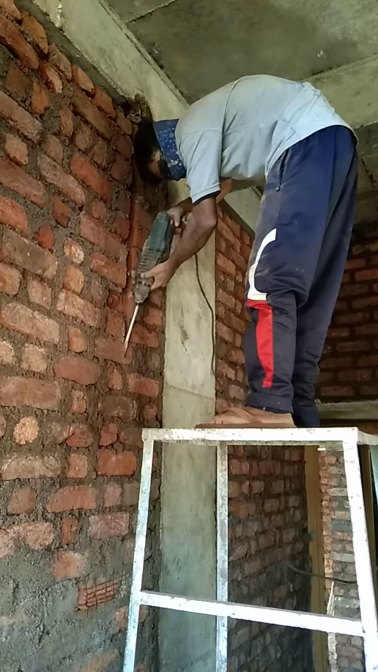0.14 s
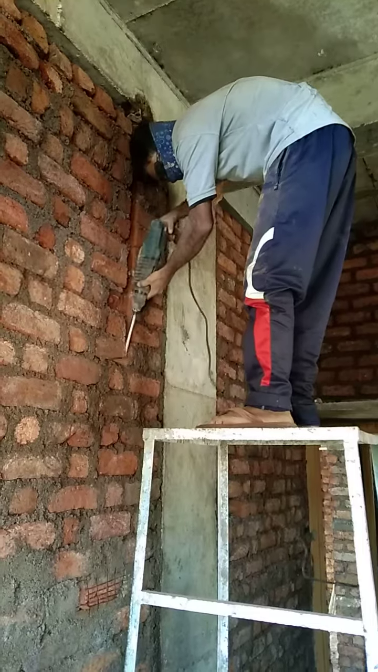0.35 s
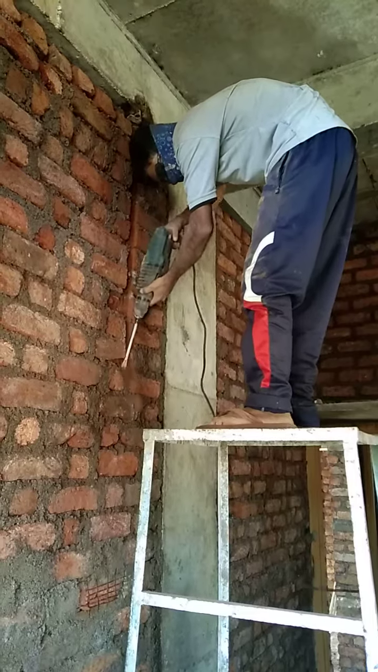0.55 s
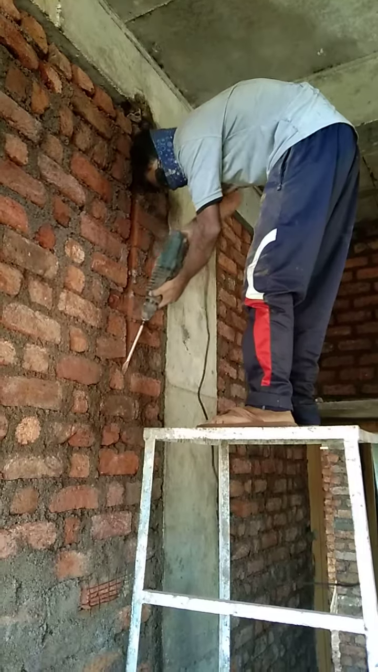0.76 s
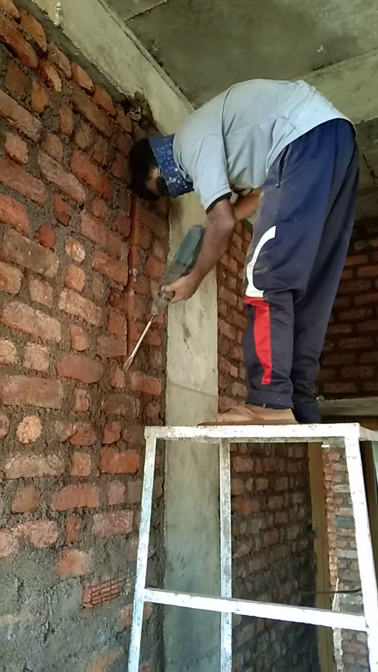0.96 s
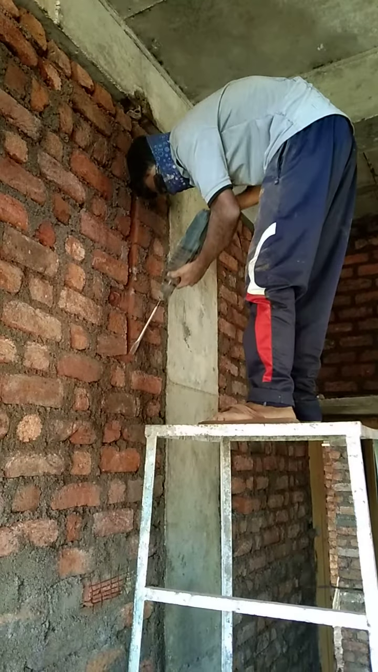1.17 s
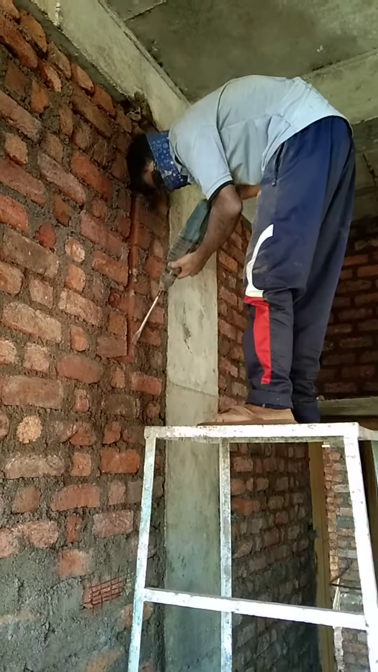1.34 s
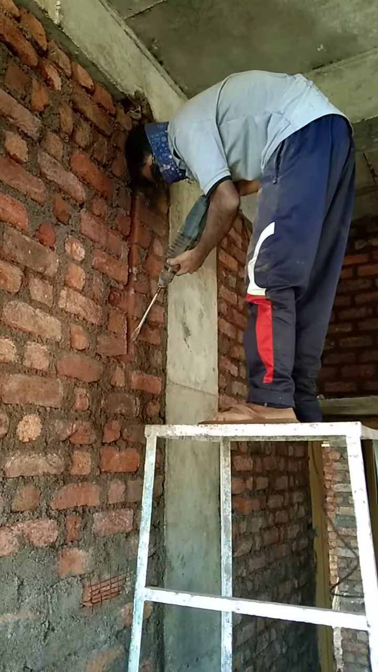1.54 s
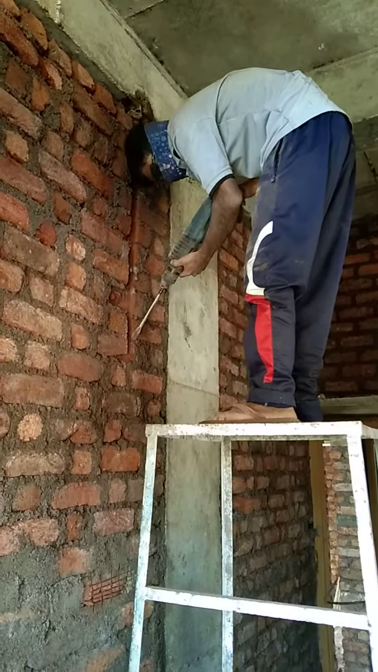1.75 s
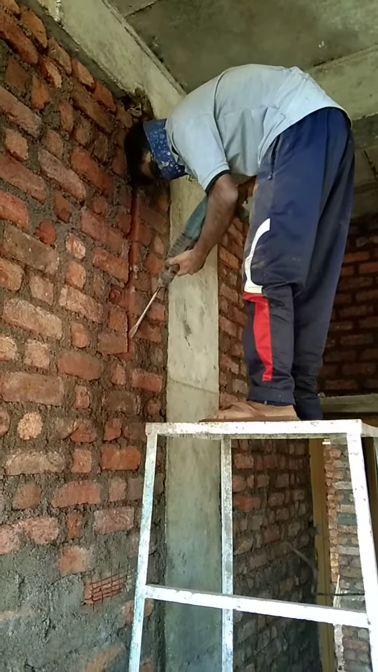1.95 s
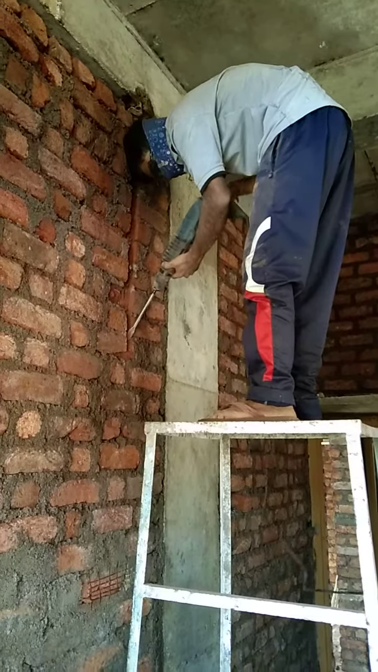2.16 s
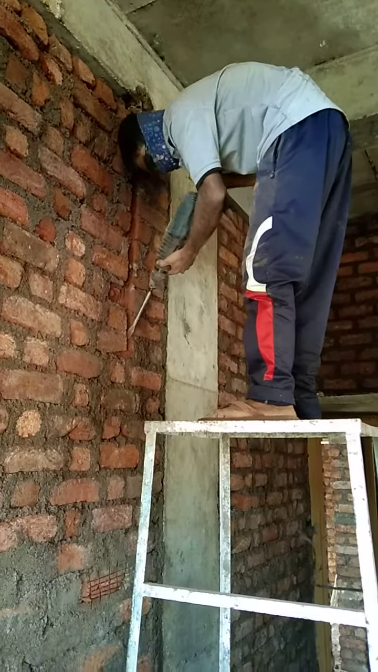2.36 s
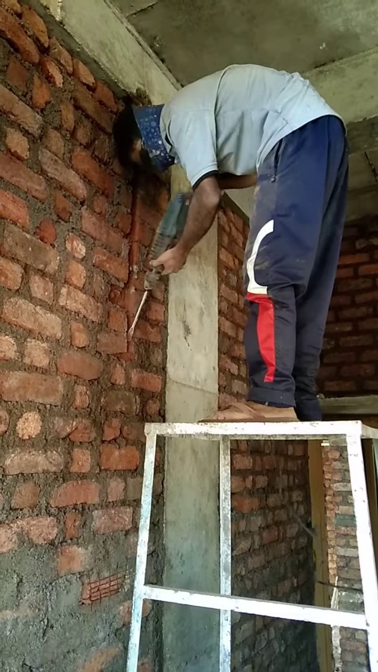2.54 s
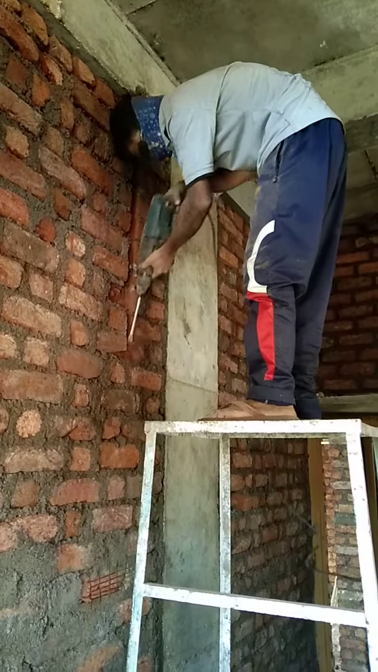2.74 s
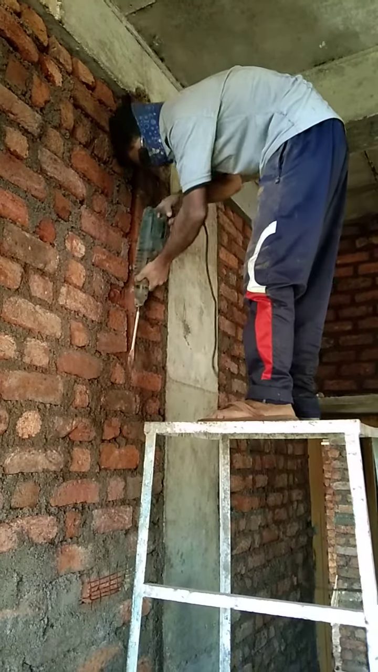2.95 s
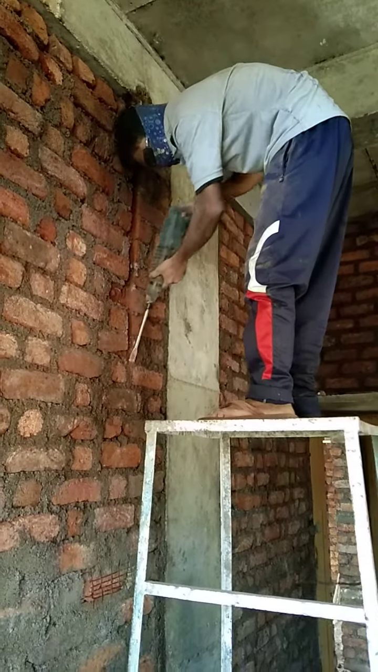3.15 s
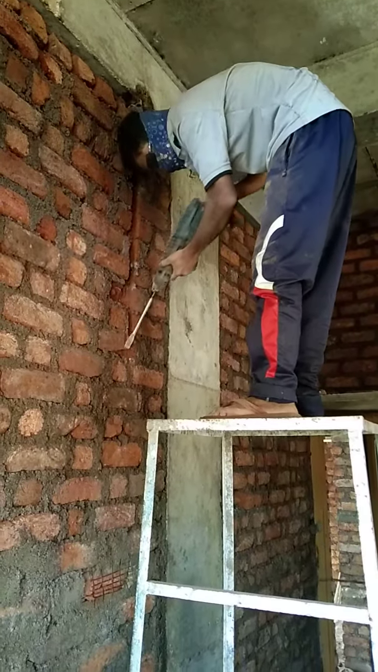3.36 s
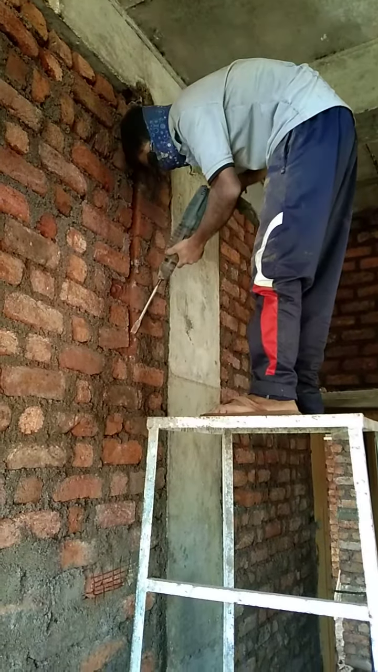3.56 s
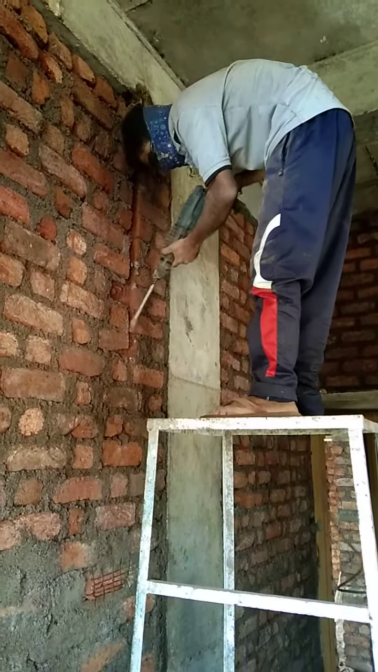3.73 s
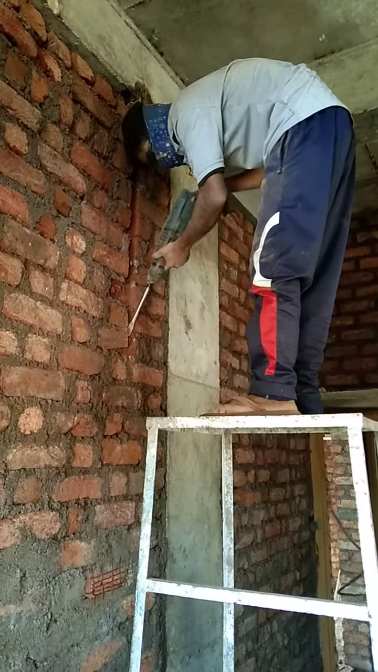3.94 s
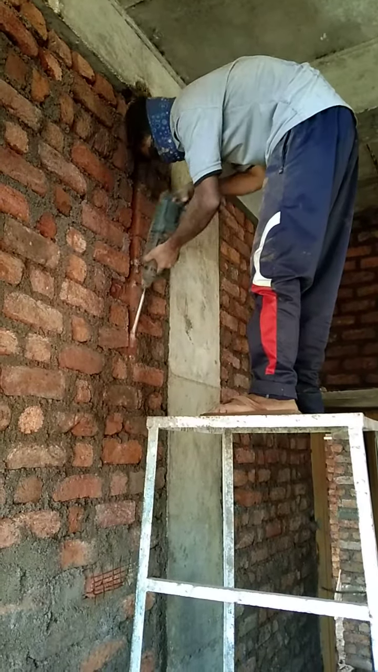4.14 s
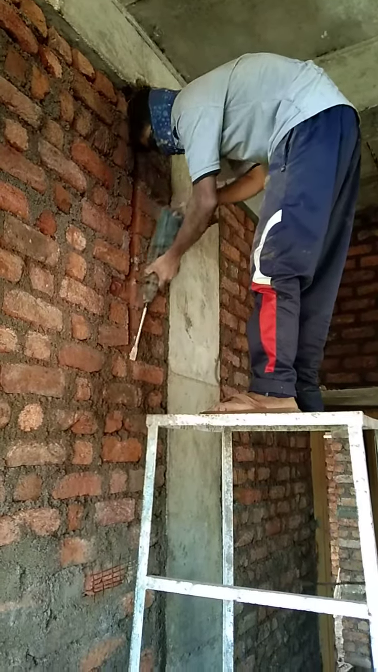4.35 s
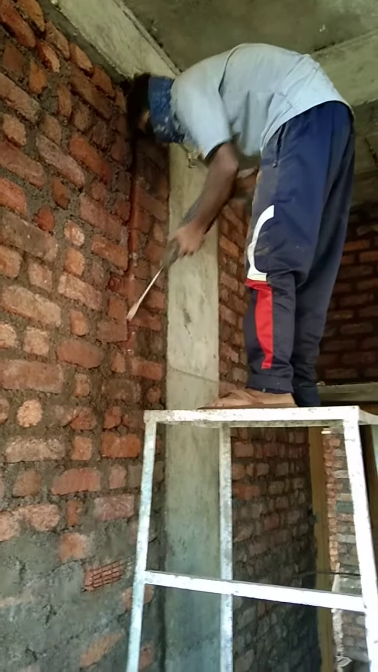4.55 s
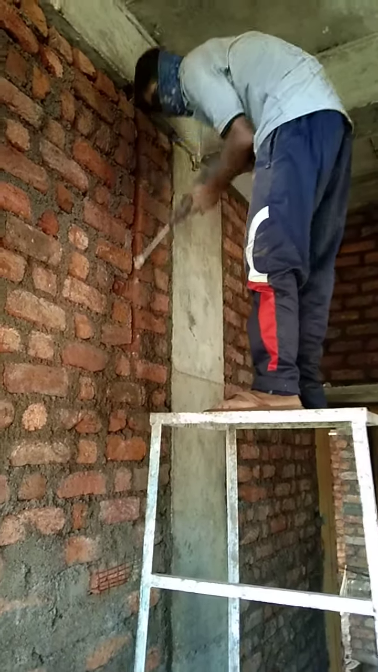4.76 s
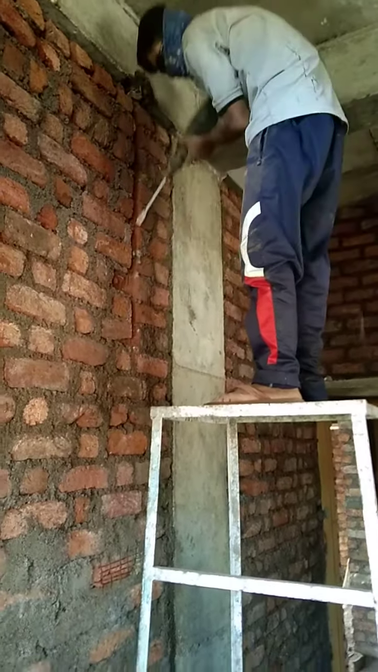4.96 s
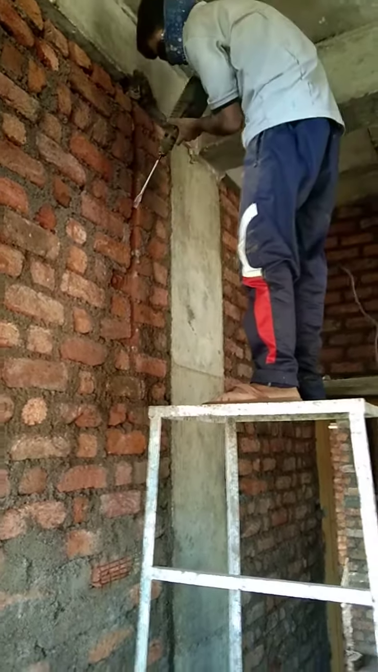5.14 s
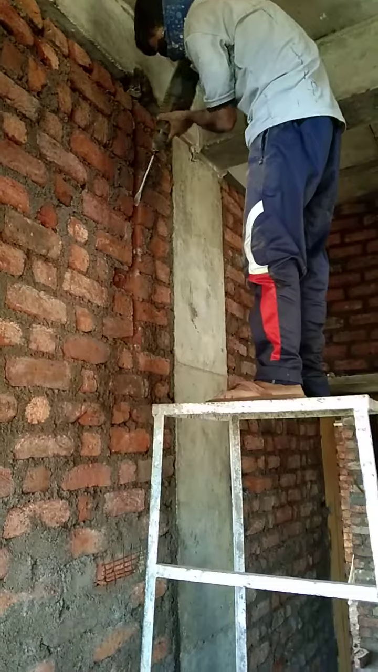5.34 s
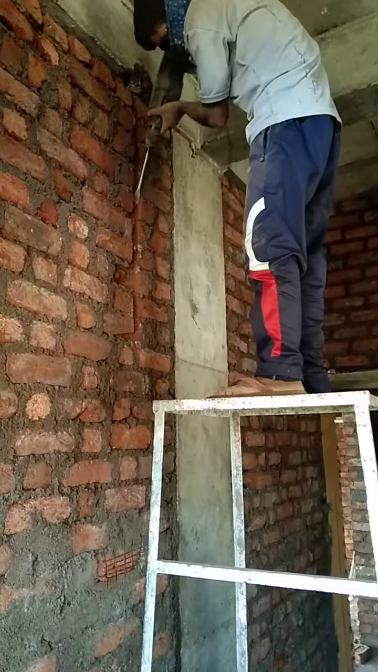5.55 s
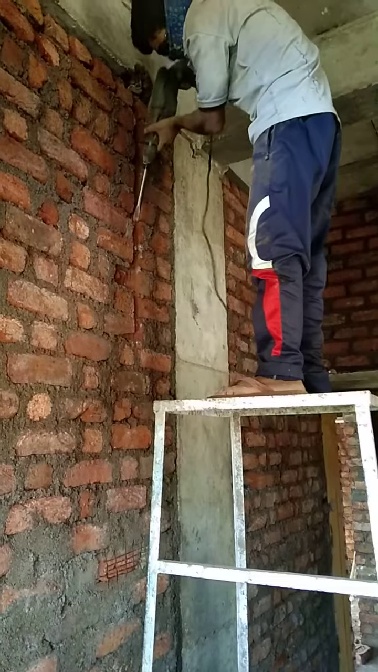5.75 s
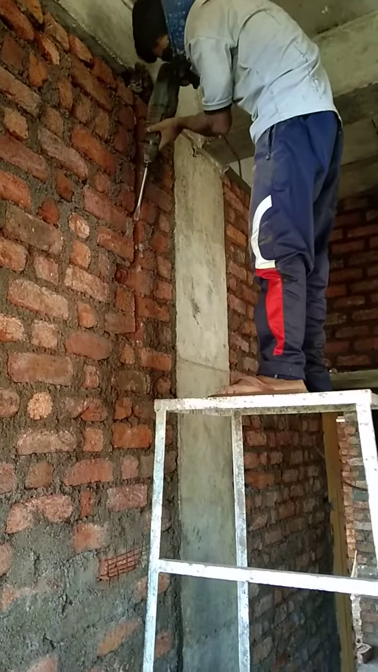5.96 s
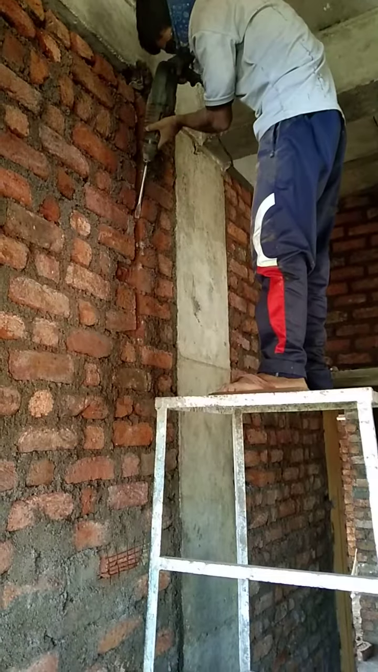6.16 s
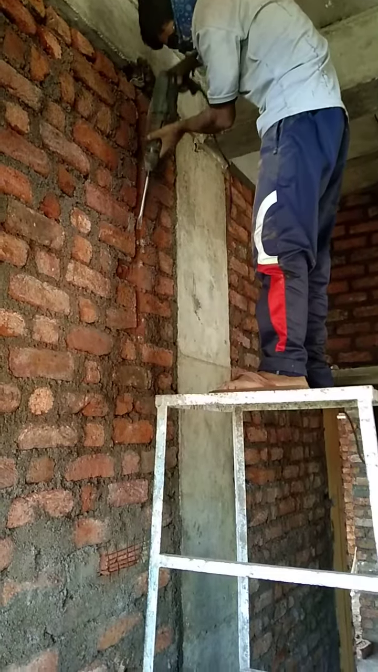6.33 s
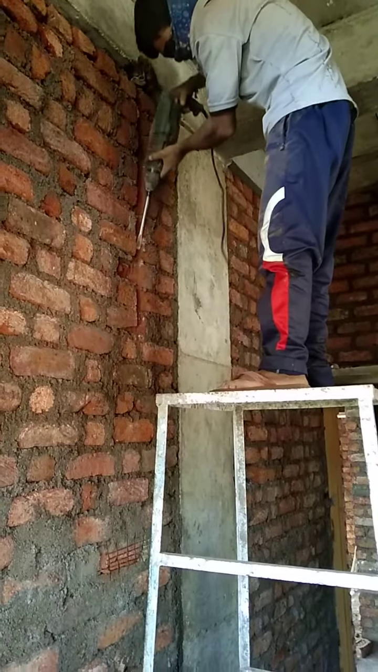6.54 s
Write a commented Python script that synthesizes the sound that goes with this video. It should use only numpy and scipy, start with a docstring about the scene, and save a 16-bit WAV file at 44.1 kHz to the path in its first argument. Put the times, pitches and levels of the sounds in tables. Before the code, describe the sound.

A rotary hammer chisels brick in harsh, rattling bursts, its motor whining down between them amid metallic clinks, scrapes and soft foot thuds.

```python
"""A rotary hammer chisels a brick wall in a bare room; the mic overloads on the hardest blows of the opening burst.
After .65 s the motor coasts down with a falling gear whine, while the loose bit clinks, feet thud on a steel
stand and a low hum sets in. A long burst from 1.8 to 3.1 s and a short one at 3.9 s each coast down too, then
clinks, scrapes, steps and ticking chips lead to a last burst from 5.6 s. Crank turns time noise bursts for the
blows and the phase of the whine; filtered noise makes the rest, and close walls add short echoes."""
import sys
import numpy as np
from scipy import signal
from scipy.fft import rfft, irfft
from scipy.io import wavfile
from scipy.ndimage import uniform_filter1d

SR = 44100
rng = np.random.default_rng(int(sys.argv[2]) if len(sys.argv) > 2 else 0)


def bounce(signal):
    """Save signal as a 16-bit WAV file at the path given by the first command-line argument."""
    frames = np.transpose(np.atleast_2d(signal))
    limited = np.clip(frames, -1, 1)
    pcm = np.round(limited * 32767).astype(np.int16)
    wavfile.write(sys.argv[1], SR, pcm)


N = 291060
T = np.arange(N) / SR
FULL_SPEED_HZ = 75  # reference speed, blows per second

# trigger pulls: pull_s, release_s, top_speed_hz (blows per second), spin_up_s
TRIGGER_PULLS = [(-1, .651, 70.57, .1), (1.765, 2.084, 40.27, .11), (2.084, 2.6, 81.09, .11),
                 (2.6, 3.087, 74.88, .03), (3.903, 4.237, 72.77, .058), (5.635, 6.6, 81.3, .098)]


def amp(db):
    """Decibels to gain."""
    return 10 ** (np.asarray(db) / 20)


def curve(rows):
    """Time and value rows joined by straight lines."""
    rows = np.array(rows)
    return np.interp(T, rows[:, 0], rows[:, 1])


def unit(x):
    """Scale to rms 1."""
    return x / np.sqrt(np.mean(x ** 2) + 1e-18)


def noise():
    """White noise."""
    return rng.standard_normal(N)


def colour(x, points, size=4096):
    """Causal minimum-phase filter of unit power gain, shaped through (Hz, dB) points."""
    hz, db = np.transpose(points)
    bins = np.fft.rfftfreq(size, 1 / SR)
    gain = amp(np.interp(np.log(bins + 1), np.log(hz), db))
    # folding the cepstrum forward makes the filter causal
    cepstrum = irfft(np.log(gain))
    cepstrum[1:size // 2] *= 2
    cepstrum[size // 2 + 1:] = 0
    response = irfft(np.exp(rfft(cepstrum)))
    return signal.fftconvolve(x, response / np.linalg.norm(response))[:N]


def band(x, hz, width):
    """One resonance, gain 1 at its centre; width in Hz."""
    return signal.lfilter(*signal.iirpeak(hz, hz / width, SR), x)


def resonate(x, modes):
    """A set of resonances sounding together, at rms 1."""
    return unit(sum(amp(db) * band(x, hz, width) for hz, width, db in modes))


def shelf(x, side, hz, db):
    """Raise or lower everything on one side of a frequency."""
    part = signal.sosfiltfilt(signal.butter(2, hz, side, fs=SR, output="sos"), x)
    return x + (amp(db) - 1) * part


def fade(x, seconds):
    """Give every impulse an exponential tail."""
    return signal.lfilter([1], [1, -np.exp(-1 / (seconds * SR))], x)


def gate(start, end, attack_s, release_s):
    """Envelope that rises, holds and dies away."""
    rise = np.clip((T - start) / attack_s, 0, 1)
    return rise * np.exp(-np.maximum(T - end, 0) / release_s)


def impulses(times, sizes):
    """Impulses of given sizes at given times."""
    samples = np.clip(np.asarray(times) * SR, 0, N - 1).astype(int)
    return np.bincount(samples, sizes, N)


def crank():
    """Blows per second: the crank runs up while the trigger is held; air drag and friction then slow it."""
    drag_s, friction_hz_per_s = .9, 26.67  # exponential slowing; friction brings it to a stop
    speed, drift = np.zeros(N), friction_hz_per_s * drag_s
    for pull, release, top, spin_up in TRIGGER_PULLS:
        before = np.interp(pull, T, speed)
        held_s = np.clip(T, pull, release) - pull
        held = top + (before - top) * np.exp(-held_s / spin_up)
        coast = (held + drift) * np.exp(-np.maximum(T - release, 0) / drag_s) - drift
        speed = np.where(T >= pull, np.maximum(coast, 0), speed)
    return speed


def strikes(turns, speed, jitter_s, scatter_db):
    """One uneven impulse per crank turn; slow blows are larger, to even out the power."""
    at = np.flatnonzero(np.diff(np.floor(turns)) > 0)
    chance = rng.standard_normal((len(at), 2))
    times = T[at] + jitter_s * chance[:, 0]
    return impulses(times, amp(scatter_db * chance[:, 1]) / np.sqrt(speed[at] + 10))


def hard_spots():
    """Hardness of the brick 0-1, gain of the singing bit, and the dip in dB of the tool's level."""
    # hard spots in the brick: start_s, end_s, singing_db (relative), dip_db
    spots = [(-.1, 0.112, -29.5, 8), (0.128, 0.316, -43, 12), (.35, 0.673, -41.5, 11.5),
             (2.618, 2.777, -28.5, 2), (2.783, 2.923, -29.5, 5), (2.995, 3.003, -23.5, 2.5),
             (4.11, 4.17, -25, 2.5), (6.21, 6.32, -39, 3.5)]
    attack_s, release_s = 0.024, 0.034
    dip_attack_s, recovery_db_per_s = 0.019, 7
    hardness, sing, dip = np.zeros((3, N))
    for start, end, sing_db, dip_db in spots:
        on = gate(start, end, attack_s, release_s)
        hardness = np.maximum(hardness, on)
        sing = sing + amp(sing_db) * on
        onset = dip_db * np.clip((T - start) / dip_attack_s, 0, 1)
        dip = np.maximum(dip, onset - recovery_db_per_s * np.maximum(T - end, 0))
    return hardness, sing, dip


def site(level_db=-67):
    """Steady background noise of the place."""
    # background colour: frequency_hz, level_db (relative)
    background = [(25, -26), (70, -8), (150, -2), (330, -21), (520, -8.5), (750, -19), (3000, -10),
                  (7300, -21), (15000, -55)]
    return amp(level_db) * colour(noise(), background)


def hum(level_db=-50, fade_db_per_s=7.5, rise_s=0.037, release_s=.05):
    """A narrow, wavering low hum, noise through two resonances, slowly fades."""
    start_s, end_s = 1.065, 1.85
    level = gate(start_s, end_s, rise_s, release_s) * amp(level_db - fade_db_per_s * (T - start_s))
    return level * unit(band(band(noise(), 207, 23), 207, 23))


def stand(step_db=-8, step_s=0.081):
    """Dull, soft thuds of feet on the steel stand: decaying low noise."""
    # feet shifting: step_s, level_db (before the common step_db)
    footfalls = [(1.05, -61), (1.53, -39), (1.58, -38), (2.05, -38), (4.61, -35), (4.699, -32), (4.91, -40),
                 (5.291, -41.5), (5.611, -47)]
    s, db = np.transpose(footfalls)
    thud = colour(noise(), [(30, -46), (80, -6.0), (150, 1), (260, -6.0), (500, -17), (2000, -53)])
    return fade(impulses(s, amp(db + step_db)), step_s) * thud


def chips(decay_s=0.0024):
    """Fragments of brick give short, bright ticks as they snap off or land."""
    # ticks: tick_s, level_db (before colouring)
    ticks = [(1.588, -42), (5.345, -38), (5.453, -46), (5.643, -29.5), (5.691, -21)]
    s, db = np.transpose(ticks)
    bursts = fade(impulses(s, amp(db)), decay_s) * noise()
    return colour(bursts, [(500, -17), (3000, -10), (7500, 4), (12000, -10), (15000, -14)])


def clinks(gain_db=-8, rise_s=0.00093, grit_db=3):
    """The loose bit knocks in its chuck or scrapes on the brick, coloured as one by the housing."""
    # bit clinking in its chuck and catching on brick: clink_s, level_db (before gain_db), t60_s
    knock_rows = [(1.045, -15, 0.16), (1.073, -28, .12), (1.098, -25, .08), (1.441, -22.5, 0.092),
                  (1.641, -33, 0.041), (1.762, -21, 0.15), (2.081, -8, 0.047), (2.107, -3, 0.06),
                  (2.799, -17, 0.016), (3.827, -12.5, 0.03), (3.935, -7.5, 0.086), (4.961, -15, 0.065),
                  (5.165, -16, 0.03), (5.262, -22, 0.064), (5.381, -24, 0.029), (5.542, -39, 0.97),
                  (5.643, -42, 0.032), (5.716, -4.5, 0.036)]
    # tip scraping as it is shifted: start_s, end_s, level_db (before colouring)
    scrape_rows = [(1.432, 1.652, -39.5), (3.75, 3.934, -34), (4.968, 5.14, -36)]
    knocks = sum(amp(db) * gate(s, s, rise_s, t60 / np.log(1000)) for s, db, t60 in knock_rows)
    scrapes = sum(amp(db) * gate(start, end, 0.037, 0.099) for start, end, db in scrape_rows)
    force = amp(gain_db) * knocks * noise()
    force = force + scrapes * unit(noise() * amp(grit_db * noise()))
    return colour(force, [(200, -15), (900, -12.5), (1700, 4.5), (3300, 3.5), (5200, -4.5),
                          (7300, -0.5), (10000, -14.5), (15000, -33)])


def shake(turns, speed, waver_db=3):
    """The reciprocating piston makes the body drone at multiples of the blow rate, more at full speed."""
    # harmonics of the shaking: multiple (of the blow rate), level_db (relative)
    harmonics = [(2, -2), (3, -5.5), (4, 2.5), (5, -5.5), (7, -10.5), (9, 8.5), (12, -19.5)]
    drone = 0
    for multiple, db in harmonics:
        waver = waver_db * unit(fade(fade(noise(), 0.094), 0.094))
        phase = 2 * np.pi * (round(multiple) * turns + rng.random())
        drone = drone + amp(db + waver) * np.sin(phase)
    return unit(drone * speed)


def motor_gain(speed, settle_s=.03):
    """The motor is louder the faster it turns, and louder under power than coasting."""
    full_speed_db, db_per_octave, drive_db = -22.5, 3, 3  # drive: added by the current while held
    stall_hz = 6.4  # the brushes fall quiet below this many blows per second
    held = np.any([(T >= pull) & (T < release) for pull, release, _, _ in TRIGGER_PULLS], axis=0)
    power = uniform_filter1d(held * 1., int(settle_s * SR) + 1)
    octaves = np.log2(speed / FULL_SPEED_HZ + 1e-9)
    return amp(full_speed_db + db_per_octave * octaves + drive_db * power) * np.tanh(speed / stall_hz)


def motor(turns, speed, throb=0.71, throb_s=0.01, grit_db=6.0, housing_db=-1):
    """Fan, brushes and gears rush as gritty noise, louder at every push of the piston."""
    # motor colour: frequency_hz, level_db (relative)
    rush_colour = [(25, -42.5), (100, -20.5), (250, -15.5), (350, -12), (500, -13), (800, -8.5), (1600, -8),
                   (2100, -3), (3400, -3.5), (5000, -6), (8200, -3), (10500, -17), (12000, -23),
                   (15500, -49.5)]
    # gearbox housing resonances: frequency_hz, width_hz, level_db (relative)
    housing = [(1146, 280, 3), (1630, 150, 2.5), (2110, 53, 7), (3150, 270, 4.5), (3930, 260, 4),
               (7800, 89, -18), (8360, 340, 7)]
    push = 1 + throb * np.exp(-(turns % 1) / (throb_s * (speed + 1)))
    rush = noise() * amp(grit_db * noise()) * push
    return unit(colour(rush, rush_colour) + amp(housing_db) * resonate(rush, housing))


def gears(turns, speed, wobble=0.17, rasp=1.0, idle_db=-15):
    """The tooth whine wavers with the load and swells as it crosses a housing resonance."""
    teeth = 33  # tooth contacts per crank turn
    mesh = 2 * np.pi * teeth * turns
    mesh = mesh + wobble * np.sin(2 * np.pi * turns) + rasp * unit(fade(noise(), 0.028))  # radians
    tone = np.sin(mesh) * np.clip(speed / 30, 0, 1) ** 2
    return band(tone, 1190, 350) + amp(idle_db) * tone


def pops(speed, thump_db=14, snap_db=13, thump_s=0.0006, snap_s=0.0007, spike_db=7, tilt=0.11,
         ping_db=-12, scatter_db=0.75):
    """Blows overload the microphone: a short, noisy low thump, slightly tilted to one side, and a dry snap."""
    # runs of overloading blows: first_s, length_s, thump_db, snap_db (before the common gains)
    runs = [(0.021, .078, -25, -18.5), (0.108, .035, -14.5, -21.5), (.151, .064, -21.5, -23),
            (0.221, .064, -25, -18), (0.292, .02, -27, -28), (.335, .05, -20.5, -19.5),
            (0.406, .12, -25.5, -20), (.536, .035, -23, -20.5), (0.58, .02, -27, -48),
            (.608, .035, -23.5, -28), (2.798, .006, -25, -32), (2.878, .006, -17, -27.5),
            (2.908, .006, -23, -28), (6.263, .006, -20, -12.5), (6.276, .006, -13.5, -17.5)]
    # thump and snap colours: frequency_hz, level_db (relative)
    thump_colour = [(20, -9), (45, -16), (70, -3), (110, 2), (300, -4.5), (700, -11), (2000, -27.5),
                    (15000, -49)]
    snap_colour = [(50, -69), (150, -0.5), (350, -3), (700, -1), (1500, -1), (3000, -8), (8000, -10.5),
                   (15000, -25.5)]
    blows = []
    for first, length, thump, snap in runs:
        period = 1 / speed[int(first * SR)]
        blows += [(at, thump, snap) for at in np.arange(first, first + length, period)]
    s, thump_levels, snap_levels = np.transpose(blows)
    # the mix of thump and snap differs every time
    thump_luck, snap_luck = rng.standard_normal((len(s), 2)).T
    thump = impulses(s, amp(thump_levels + scatter_db * thump_luck))
    snap = impulses(s, amp(snap_levels + scatter_db * snap_luck))
    noisy_thump = fade(thump, thump_s) * (np.tanh(noise()) - tilt)  # a slight offset to one side
    crackle = fade(snap, snap_s) * noise() - amp(spike_db) * snap
    dry_snap = colour(crackle, snap_colour) + amp(ping_db) * band(crackle, 8600, 450)
    return amp(thump_db) * colour(noisy_thump, thump_colour) + amp(snap_db) * dry_snap


def chisel(blows, lower_db=-1, upper_db=-2, crack_db=-3):
    """On hard spots the tip cracks sharply and two lengthwise modes of the steel bit sing."""
    force = fade(blows, 0.0089) * noise()
    upper = unit(band(band(force, 12620, 260), 12620, 260))
    lower = unit(band(band(force, 8500, 450), 8500, 450))
    crack = unit(band(fade(blows, 0.0014) * noise(), 7900, 6000))
    return amp(upper_db) * upper + amp(lower_db) * lower + amp(crack_db) * crack


def pressure():
    """Gain of the blows from how hard the chisel is pressed on the wall, silent between bursts."""
    # one curve a burst: time_s, level_db (of the blows, before the tone and dips)
    bursts = [
        [(0, -22.5), (.3, -21.5), (.6, -23.5), (.8, -27.5), (1.02, -29), (1.14, -40)],
        [(1.9, -30), (2.06, -23.5), (2.14, -16.5), (2.25, -18), (2.8, -21), (3.22, -20.5), (3.36, -29),
         (3.47, -23.5), (3.68, -47)],
        [(3.88, -32), (3.96, -17.5), (4.1, -18.5), (4.26, -16.5), (4.4, -21.5), (4.51, -20), (4.72, -26.5),
         (4.95, -48)],
        [(5.68, -55), (5.745, -16.5), (5.85, -17.5), (6.15, -19.5), (6.42, -19.5), (6.6, -20.5)],
    ]
    return sum(amp(curve(rows)) * (T >= rows[0][0]) * (T <= rows[-1][0]) for rows in bursts)


def hammer(blows, contact_s=0.00077, crush_s=0.003, grit_db=4, crack_db=-9, ring_db=-3):
    """Each blow builds up, cracks and crushes brick; wall colours it, and chisel and brick ring by place."""
    # times at which the tip moves to a new place in the cut: move_s
    moves = [2.35, 2.59, 3.08, 3.9, 4.37, 5.5]
    # chisel and brick resonances, one list a place: frequency_hz, width_hz, level_db (relative)
    rings = [
        [(3300, 880, 25), (3880, 170, -10), (4950, 49, -20), (6630, 57, -6)],
        [(2070, 40, -5), (3265, 68, 13), (3900, 160, 7), (6450, 120, -26)],
        [(610, 27, 3), (1260, 250, -8), (2420, 67, -23), (2960, 220, -3.5), (4350, 480, -6.5),
         (8800, 920, -5.5)],
        [(2114, 260, 3), (3500, 1200, -2), (4210, 110, -11.5), (5900, 240, -3.5)],
        [(1190, 190, 3), (2220, 200, 5.5), (3200, 1100, 5), (3800, 560, 4), (6920, 600, -18)],
        [(1120, 250, -12), (1730, 230, 5.5), (1980, 140, 8.5), (2980, 400, -11)],
        [(2340, 110, -3), (2880, 170, 3), (3300, 170, -4), (3850, 240, 2), (4330, 140, -1.5), (6100, 200, -1),
         (7020, 99, 6)],
    ]
    # wall colour: frequency_hz, level_db (relative)
    wall = [(25, -53), (80, -37), (250, -31), (350, 0.5), (470, -25), (650, -5.5), (1700, -2), (2200, 3.5),
            (4000, 3), (5200, 0.5), (7400, 1), (9500, -8.5), (12000, -14.5), (15500, -49.5)]
    envelope = fade(fade(blows, contact_s), crush_s)
    crush = unit(envelope * noise() * amp(grit_db * noise()))
    force = unit(crush + amp(crack_db) * unit(blows))
    place = np.digitize(T, moves)
    ring = sum((place == k) * resonate(force, modes) for k, modes in enumerate(rings))
    return unit(colour(force, wall) + amp(ring_db) * ring)


def tool_tone(tool, pace, hardness):
    """Speed and hard spots brighten the tool; its lows follow a drawn curve and swell on hard spots."""
    # level of the tool's lows: time_s, level_db (before the swell on hard spots)
    lows = [(0, 0), (.85, -1.5), (1.2, -2), (1.6, -5), (2.0, 0.5), (2.25, -3), (2.7, -2), (3.15, -2),
            (3.6, -1), (3.95, -1.5), (4.3, -2), (4.75, 0.5), (5.08, -10), (5.35, 2.5), (5.75, -5.5),
            (6.6, -4.5)]
    rest_db, speed_db, hard_db, body_hard_db = -5.5, 6, 3, 6
    tool = shelf(tool, "high", 3370, rest_db + speed_db * pace + hard_db * hardness)
    return shelf(tool, "low", 1300, curve(lows) + body_hard_db * hardness)


def room(x, wet_db=-3, gap_s=0.0025, size=2048):
    """Close brick walls give dense, short echoes, in a fresh random pattern for every short block."""
    t60 = .24  # s
    t = T[:SR // 5]
    wet = np.zeros(N + SR)
    for start in range(0, N, size):
        tail = rng.standard_normal(len(t)) * amp(-60 * t / t60) * (t > gap_s)
        echoes = signal.fftconvolve(x[start:start + size], tail / np.linalg.norm(tail))
        wet[start:start + len(echoes)] += echoes
    # open doorways let the deep bass escape; rough brick soaks up the highest treble
    wet = signal.sosfilt(signal.butter(2, [150, 13000], "band", fs=SR, output="sos"), wet[:N])
    return (x + amp(wet_db) * wet) / np.hypot(1, amp(wet_db))


def scene(gear_db=-8, shake_db=-26):
    """Speed times blows and drives the motor, pressure sets blow strength, hard spots sing and dip the tool."""
    speed = crank()
    turns = .3 + np.cumsum(speed) / SR
    hardness, sing, dip_db = hard_spots()
    running = motor_gain(speed)
    blows = strikes(turns, speed, jitter_s=.0003, scatter_db=1.27)
    machine = motor(turns, speed) + amp(gear_db) * gears(turns, speed)
    tool = pressure() * hammer(blows) + running * machine
    tool = tool_tone(tool, speed / FULL_SPEED_HZ, hardness)
    drone = running * amp(shake_db - dip_db) * shake(turns, speed)
    steel = sing * chisel(strikes(turns, speed, jitter_s=0.00025, scatter_db=4))
    in_room = room(amp(-dip_db) * tool + clinks() + chips())
    return (in_room + drone + steel + pops(speed) + stand() + hum() + site())[None]


def record(dry, drive=1):
    """The phone rounds the highest peaks and cuts the top."""
    ceiling, top_hz = .8, 15500
    rounded = ceiling * np.tanh(drive * dry / ceiling)
    return signal.sosfilt(signal.ellip(10, .2, 80, top_hz, fs=SR, output="sos"), rounded)


dry = scene()
out = record(dry)
bounce(out)
```